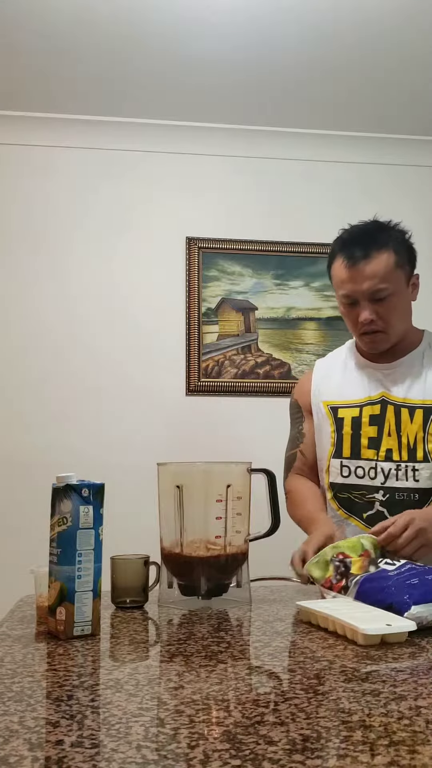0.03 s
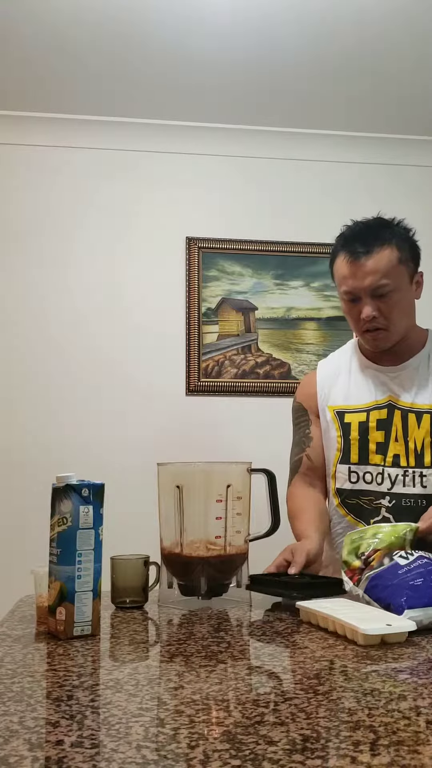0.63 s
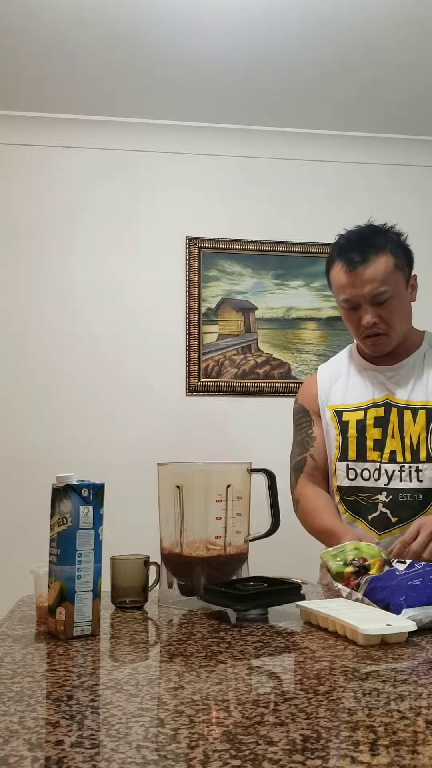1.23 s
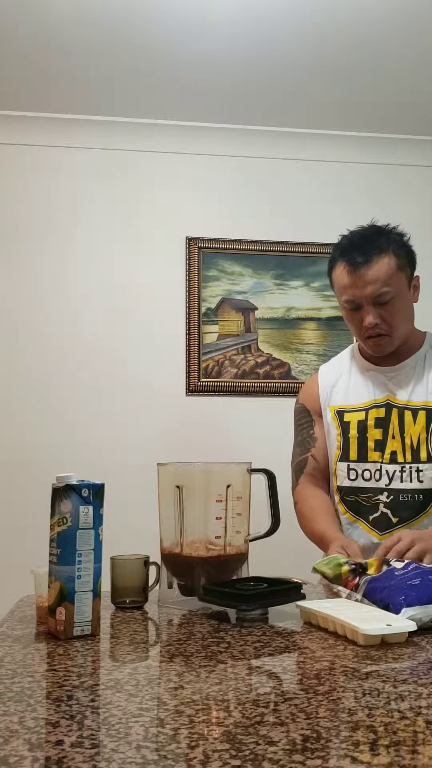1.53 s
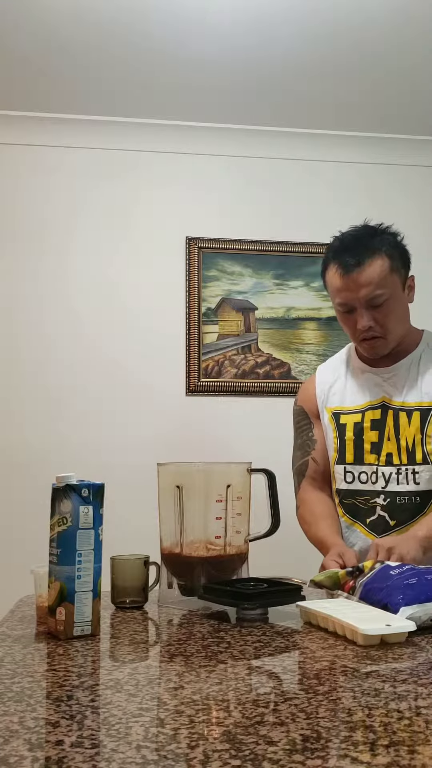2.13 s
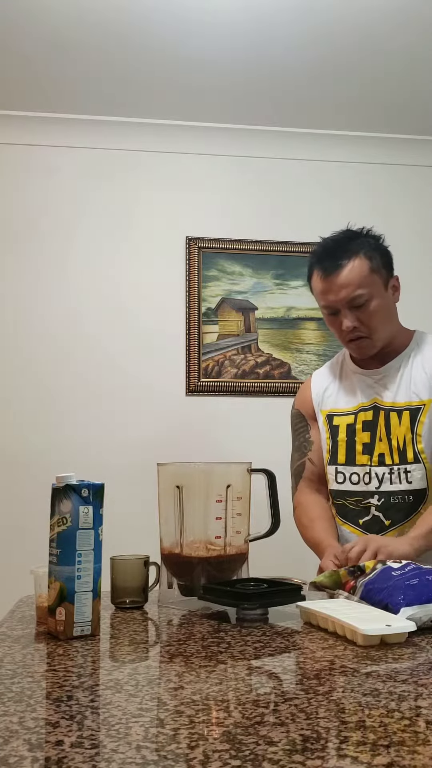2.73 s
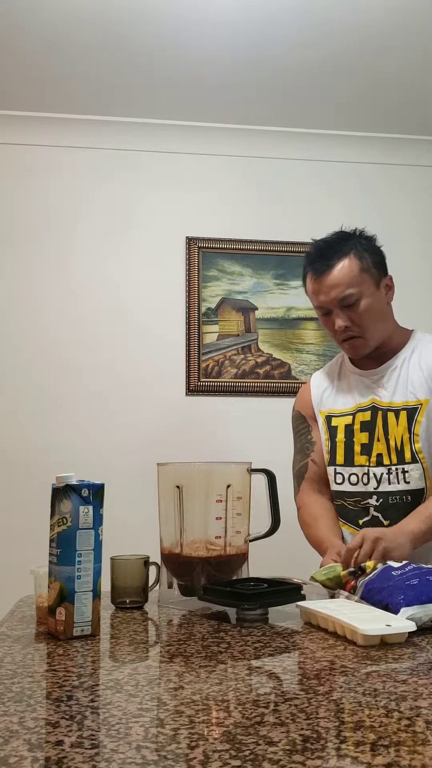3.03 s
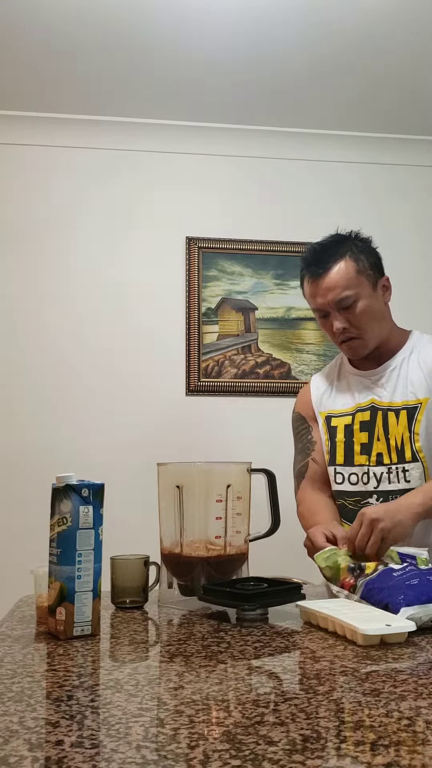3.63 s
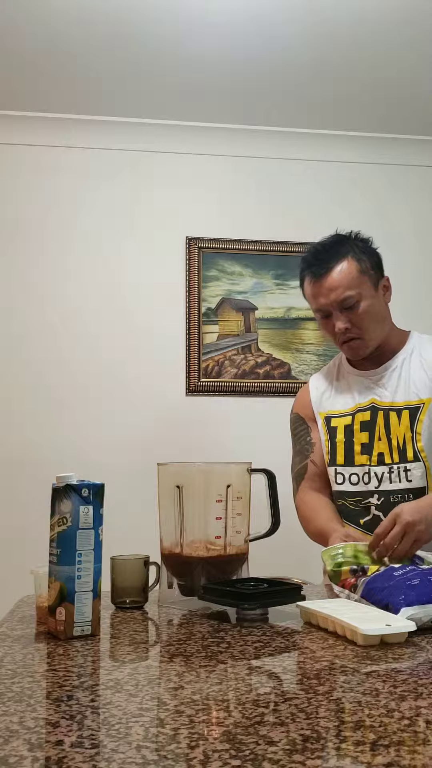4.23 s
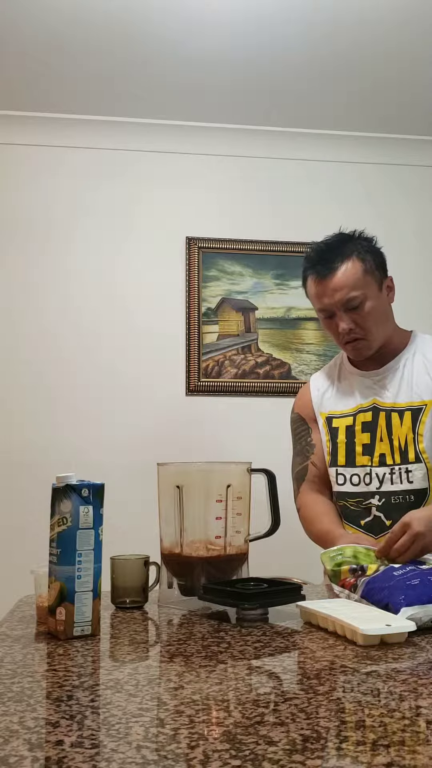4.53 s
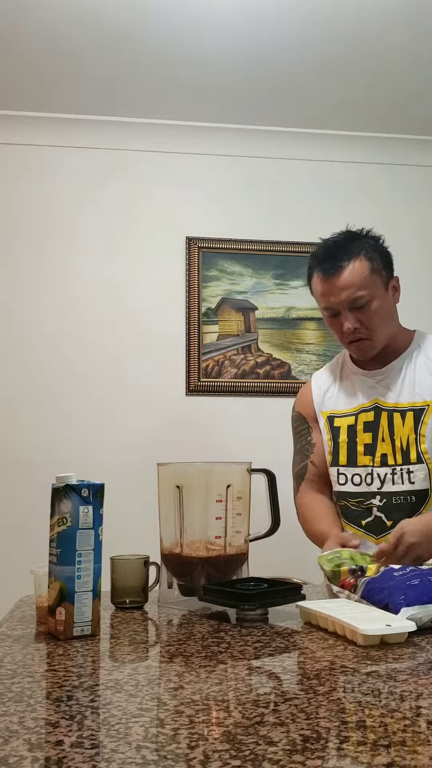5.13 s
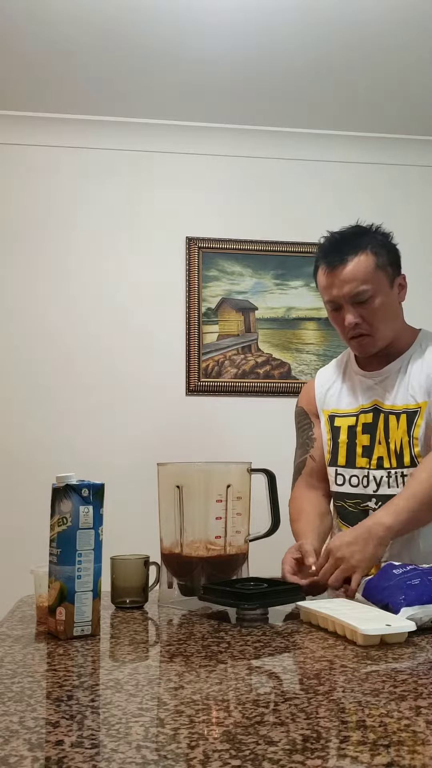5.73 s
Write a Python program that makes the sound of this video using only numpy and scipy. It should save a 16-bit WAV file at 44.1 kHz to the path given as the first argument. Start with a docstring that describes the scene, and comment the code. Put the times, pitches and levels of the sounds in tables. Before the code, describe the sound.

Plastic bags rustle and crackle in a small kitchen, with a plastic lid knocking and clattering onto the counter at the start.

```python
"""A hard plastic lid is knocked, clatters and is set down in the first second, among rustling food bags.
The bags are gripped and handled throughout: the film buckles in bursts of tiny clicks, snaps as single
creases flip, and sizzles where it glides over itself. All this is on a stone kitchen counter, about
a metre from a phone's two microphones. The small hard room answers everything, over a low mains hum."""
import sys
import numpy as np
from scipy import signal
from scipy.fft import rfft, irfft
from scipy.io import wavfile
from scipy.ndimage import uniform_filter1d

SR = 44100
rng = np.random.default_rng(int(sys.argv[2]) if len(sys.argv) > 2 else 0)


def store_wav(level_fs):
    """Save 16-bit WAV to argv[1]."""
    pcm = np.round(np.clip(np.atleast_2d(level_fs), -1, 1) * 32767)
    wavfile.write(sys.argv[1], SR, pcm.T.astype(np.int16))


N = 254898
T = np.arange(N) / SR
TAIL = 12288  # samples allowed for a ring or the room to die away

# Film sliding under the fingers. Each row: time in seconds, level in dB.
FILM_SLIDE = [(0, -48.5), (.3, -46), (.4, -42), (.48, -31), (.66, -50.5), (1.2, -62), (1.42, -60.5),
              (1.65, -48), (2.45, -59), (2.7, -42.5), (3.2, -49.5), (3.5, -54.5), (4.5, -56), (4.95, -65),
              (5.18, -52), (5.78, -48.5)]
# The dull click of a large panel of film. Each row: frequency in Hz, relative level in dB.
PANEL_SPECTRUM = [(80, -1.5), (180, -3), (330, -2.5), (630, -4.5), (880, 2.5), (1350, -2), (1900, -1.5),
                  (2600, -2), (3200, -5), (3800, -9.5), (5000, -9), (8000, -24.5), (16000, -65)]
# The bright tick of a small crease. Each row: frequency in Hz, relative level in dB.
CREASE_SPECTRUM = [(500, -41.5), (2000, -2), (3500, 2.5), (5000, 7), (6800, 3), (8200, -5.5), (10000, -1.5),
                   (12500, -3.5), (15800, -2)]


def bags():
    """Large panels of film crumple dully, small creases tick brightly; each grip sets off a burst."""
    # The fingers grip and the film gives way.
    # Each row: start in seconds, hold in seconds, level in dB, crispness in dB.
    grips = [(0, 0.026, -40, -10), (0.101, 0.025, -38, -3), (0.143, 0.074, -41, -14),
             (.222, 0.087, -34, -1.5), (0.318, 0.047, -39, -13), (0.538, 0.063, -37, -1),
             (.903, 0.068, -43.5, -6), (1.003, .045, -48.5, -2), (1.044, .029, -45.5, 10.5),
             (1.21, 0.037, -59.5, 8), (1.276, 0.033, -48.5, 2), (1.303, .075, -39.5, -0.5),
             (1.671, 0.017, -44, -0.5), (1.738, .145, -51.5, -3), (1.959, 0.11, -52, 2),
             (2.216, 0.028, -47.5, -4), (2.359, 0.17, -61, -17), (2.579, 0.027, -46, -5),
             (2.714, 0.082, -38, -3), (2.926, .033, -51, 3), (3.005, .058, -45.5, -0.5),
             (2.977, 0.019, -39.5, 5), (3.109, 0.049, -42.5, 3.5), (3.195, .05, -45, -6),
             (3.273, 0.019, -42, -2.5), (3.43, 0.089, -43.5, 0), (3.621, .047, -41, -6),
             (3.726, 0.04, -45.5, -9.5), (3.923, .125, -52.5, -16), (4.117, 0.074, -48, -13),
             (4.341, .022, -48.5, -5), (4.42, 0.024, -45.5, -3), (4.498, 0.064, -57, 1),
             (4.688, 0.054, -53, -0.5), (4.821, 0.036, -49.5, -0.5), (5.19, 0.082, -44.5, -7),
             (5.37, 0.08, -56.5, 8.5), (5.454, 0.089, -42.5, -9), (5.633, 0.15, -46.5, 0.5),
             (5.702, 0.019, -39.5, 4)]
    slide = undb(np.interp(T, *np.transpose(FILM_SLIDE)))
    panels = slide * undb(-4) * buckles(N, rate=350, spread_db=4)
    creases = slide * undb(-10) * buckles(N, rate=270, spread_db=6)
    for start, hold_s, db, crisp_db in grips:
        add(panels, start, undb(db) * grip(hold_s, rate=400))
        add(creases, start, undb(db + crisp_db) * grip(hold_s, rate=650))
    crumple = film_patches(panels, PANEL_SPECTRUM, flutter_db=2.5, wet_db=0.5)
    ticks = film_patches(creases, CREASE_SPECTRUM, flutter_db=-6.5, wet_db=-2)
    return crumple + ticks


def grip(hold_s, rate, attack_s=0.0011, release_s=0.003, swell_db=1):
    """Clicks of one grip start quickly, swell in mid-squeeze and die out as the fingers let go."""
    t = T[:int((hold_s + 4 * release_s) * SR)]
    pressure = (1 - np.exp(-t / attack_s)) * np.exp(-np.maximum(t - hold_s, 0) / release_s)
    swell = undb(swell_db * np.sin(np.pi * np.minimum(t / hold_s, 1)))
    return unit(pressure * swell * buckles(len(t), rate, spread_db=4.5)) * np.sqrt(hold_s * SR)


def buckles(size, rate, spread_db):
    """Film buckles at random, rate times a second: many small clicks and a few large, at rms 1."""
    count = max(int(rate * size / SR), 2)
    positions = (rng.random(8192)[:count] * size).astype(int)
    # strengths are spread exponentially in dB, up to the largest that a crease can give
    rank = np.arange(1, count + 1) / count
    strengths = undb(-spread_db * np.log(rank + 0.008))
    return unit(np.bincount(positions, strengths, size)) * np.sqrt(size)


def film_patches(clicks, spectrum, flutter_db, wet_db, flutter_s=0.0015, tint_db=2, count=4):
    """Each click comes from one of several patches of film with its own colour, brief ring and spot."""
    patch, out = rng.integers(0, count, N), 0
    hz, db = np.transpose(spectrum)
    tints = rng.standard_normal((count, len(hz)))
    for k, tint in enumerate(tints - tints.mean(axis=0)):
        flutter = undb(flutter_db) * unit(rng.standard_normal(TAIL) * np.exp(-T[:TAIL] / flutter_s))
        flutter[0] += 1  # the click itself
        path = kitchen(near_db=1, wet_db=wet_db, near_s=0.005)
        colour = click(np.column_stack([hz, db + tint_db * tint]))
        response = unit(through(through(path, flutter), colour))
        out = out + through(clicks * (patch == k), response)
    return out


def snaps(spots=6):
    """A crease flips with a crack, and the panel behind it pops at its own pitch."""
    # Each row: start in seconds, level in dB, crispness in dB, pitch of the panel in Hz.
    loud_creases = [(1.19, -16.5, -48, 1120), (1.277, -15, -25, 1630), (1.381, -15, -14, 830),
                    (1.625, -16.5, -30, 800), (1.788, -18, -11, 960), (1.883, -16.5, -26, 1640),
                    (1.964, -12, -25, 2320), (1.968, -26, 13.5, 1020), (2.048, -16, -28, 1730),
                    (2.074, -19, -37, 1100), (2.4, -21, -19, 1110), (2.589, -15, -11, 1750),
                    (2.6, -17, -25, 2570), (2.672, -17.5, -14, 1090), (2.979, -12, 0.5, 2420),
                    (2.992, -11.5, -20, 851), (3.2, -15, -12, 1740), (3.277, -15.5, -14, 2370),
                    (3.289, -15, -27, 1930), (3.409, -20.5, -7, 2380), (3.439, -23, 14, 2480),
                    (3.505, -13, -5.5, 2570), (3.731, -11, -10, 1420), (3.744, -16, -19, 2390),
                    (3.962, -19, -21, 806), (4.118, -17, -23, 1750), (4.145, -15, -7, 2570),
                    (4.222, -21, -13, 1070), (4.432, -22, -16, 1030), (4.651, -24, 2.5, 2470),
                    (4.702, -22.5, -25, 890), (4.884, -19.5, -12, 800), (5.096, -12.5, -31, 2310),
                    (5.101, -17, 2.5, 3000), (5.191, -17.5, -27, 1730), (5.458, -16, -19, 2740),
                    (5.483, -19.5, -19, 830), (5.709, -15, -3, 930), (5.757, -15.5, 6.5, 2200)]
    out = np.zeros((2, N))
    paths = [kitchen(near_db=4, wet_db=-1.5, near_s=0.0058) for _ in range(spots)]
    dull, bright = click(PANEL_SPECTRUM), click(CREASE_SPECTRUM)
    for k, (start, db, crisp_db, hz) in enumerate(list(loud_creases) + faint_creases()):
        path = paths[k % spots]
        pop = unit(through(path, dull + undb(-4) * flex(hz, rise_s=0.00056)))
        crack = unit(through(path, bright))
        add(out, start, undb(db) * (pop + undb(crisp_db) * crack))
    return out


def faint_creases(per_second=9, over_slide_db=26.5, low_hz=760, high_hz=2910):
    """More rows for snaps(): creases flip at uneven gaps, as strongly as the film is being moved."""
    gap, softness, colour, pitch = rng.random((128, 4)).T
    starts = np.cumsum(0.2 + 1.6 * gap) / per_second
    db = np.interp(starts, *np.transpose(FILM_SLIDE)) + over_slide_db - (2 * softness - 1)
    crisp_db = -17 + 8 * (2 * colour - 1)
    hz = low_hz * (high_hz / low_hz) ** pitch
    return list(np.column_stack([starts, db, crisp_db, hz])[starts < T[-1]])


def glides():
    """Film gliding over film gives a fine, very high sizzle that swells and fades."""
    # Each row: start in seconds, end in seconds, level in dB.
    strokes = [(0.619, 0.895, -49), (0.893, 0.938, -44), (1.286, 1.394, -47), (1.83, 2.098, -60),
               (2.223, 2.262, -41.5), (3.94, 4.052, -66), (4.135, 4.197, -56), (4.197, 4.4, -62.5),
               (5.629, 5.78, -50.5)]
    clicks = np.zeros(N)
    for start, end, db in strokes:
        size = int((end - start) * SR)
        swell = np.sqrt(np.hanning(size))
        add(clicks, start, undb(db) * swell * buckles(size, rate=2800, spread_db=4.5))
    sizzle = click([(3000, -40), (7500, 1.5), (9200, 3.5), (11500, -4), (14000, 5.5), (16000, 4)])
    return through(clicks, through(kitchen(near_db=7, wet_db=-2), sizzle))


def lid_knocks(soft_hz=2200):
    """Blows flex the lid's wall and wake its low modes; on the hard rim they crack and ring high too."""
    # Each row: start in seconds, level in dB, sharpness in dB, wall pitch in Hz, wall share in dB.
    blows = [(0.0883, -7.5, -19, 967, 8.5), (.140, 0, -31, 1015, 1), (.149, 0, -32, 1400, -12),
             (.254, 2.5, -36, 840, 8), (0.384, -8.5, -12.5, 1060, 0), (.415, 1, -3.5, 1970, -6.5),
             (.423, 7.5, 3, 900, -0.5), (.430, 4.5, 3.5, 890, -7.5), (0.437, -1.5, 5, 1350, 1),
             (0.485, -5.5, 0.5, 960, -2.5), (.494, -5.5, 3, 1970, 1.5), (0.552, -5.5, -12, 1030, 7),
             (.570, -2, -3.5, 1370, -2), (0.605, 2, -11, 1720, 5), (0.6134, 7.5, -15, 1350, -10.5),
             (0.623, 6.5, -12.5, 1620, 0.5)]
    # The lid's ring. Each row: frequency in Hz, t60 in seconds, relative level in dB.
    modes = [(250, 0.046, -12.5), (462, 0.032, -12), (700, 0.046, -22), (937, 0.065, -1.5),
             (1160, 0.026, -21), (1320, 0.031, -7), (1410, 0.039, -15.5), (1765, .028, -4.5),
             (1886, 0.041, 2.5), (2570, 0.039, -3.5), (2930, .025, -19), (4076, 0.072, 0.5),
             (4740, 0.015, -5), (6250, 0.028, -8), (7140, 0.032, 0), (8930, 0.019, 1), (10600, 0.025, -1),
             (11920, 0.013, 2), (13260, .012, -16)]
    # The dull and the sharp part of a contact. Each row: frequency in Hz, relative level in dB.
    knock_spectrum = [(50, -25.5), (170, 0), (300, -8), (600, -3.5), (1000, 5.5), (1900, -0.5), (2800, -5),
                      (4000, -18), (8000, -38), (16000, -27)]
    crack_spectrum = [(400, -38.5), (2000, 6.5), (4200, 9.5), (5600, 1), (7200, 14), (8200, -13.5),
                      (10400, 1.5), (11300, -9.5), (13000, 14), (14200, -10), (16000, -7)]
    out, t = np.zeros((2, N)), T[:TAIL]
    # a soft contact lasts too long to wake the high modes
    low_modes = [(hz, t60, db - 10 * np.log10(1 + (hz / soft_hz) ** 6)) for hz, t60, db in modes]
    for start, db, sharp_db, wall_hz, wall_db in blows:
        path = kitchen(near_db=4, wet_db=-2, near_s=0.004)
        # the rim chatters for a moment before it lets go
        chatter = unit(rng.standard_normal(TAIL) * t * np.exp(-t / 0.00059))
        rim = through(path, chatter)
        bend = undb(wall_db) * unit(through(path, flex(wall_hz, rise_s=0.0011)))
        low_ring = undb(-1.5) * unit(through(path, ring(low_modes)))
        knock = unit(unit(through(rim, click(knock_spectrum))) + low_ring + bend)
        full_ring = undb(-4) * through(path, ring(modes))
        crack = unit(through(rim, click(crack_spectrum)) + full_ring)
        add(out, start, undb(db) * (knock + undb(sharp_db) * crack))
    return out


def lid_settling():
    """The lid is pressed down onto its rest with a few cushioned thuds."""
    # Each row: start in seconds, level in dB, share of hard contact in dB.
    thuds = [(0.819, -8, -20), (0.829, -6.5, -12), (0.876, -14.5, 19), (0.908, -11.5, -12), (0.93, -8, -7),
             (0.944, -16, 4)]
    # Lid and rest ring together. Each row: frequency in Hz, t60 in seconds, relative level in dB.
    modes = [(220, 0.045, -12.5), (394, 0.058, 1), (470, 0.059, -17), (583, 0.1, -12), (851, 0.035, -9),
             (1168, 0.085, -11.5)]
    # Each row: frequency in Hz, relative level in dB.
    contact_spectrum = [(70, -19), (250, 3.5), (450, -10), (1100, -6), (2000, -5), (4000, -14.5),
                        (16000, -34)]
    out = np.zeros((2, N))
    for start, db, hard_db in thuds:
        path = kitchen(near_db=5.5, wet_db=-1)
        contact = undb(hard_db) * through(path, click(contact_spectrum))
        add(out, start, undb(db) * unit(through(path, ring(modes)) + contact))
    return out


def flex(hz, rise_s):
    """A thin wall swings up and dies away within a few cycles."""
    t = T[:2048]
    return unit(np.sin(2 * np.pi * hz * t) * t * np.exp(-t / rise_s))


def ring(modes):
    """Decaying modes; their random signs stand for where the blow lands."""
    t, out = T[:TAIL], 0
    for hz, t60, db in modes:
        mode = unit(np.sin(2 * np.pi * hz * t) * undb(-60 * t / t60))
        out = out + rng.choice([-1, 1]) * undb(db) * mode
    return unit(out)


def click(spectrum, size=2048):
    """The shortest causal click that has this spectrum."""
    gains = undb(along(spectrum, np.fft.rfftfreq(size, 1 / SR)))
    cepstrum = irfft(np.log(gains))
    cepstrum[1:size // 2] *= 2
    cepstrum[size // 2 + 1:] = 0
    return unit(irfft(np.exp(rfft(cepstrum))))


def kitchen(near_db, wet_db, near_s=0.0084, gap_s=0.0021):
    """From one spot to the microphones: direct sound, scatter off counter and jars, then the walls."""
    # Each row: frequency in Hz, t60 in seconds.
    room_decay = [(125, 0.15), (500, 0.27), (2000, 0.2), (6000, 0.23), (14000, 0.16)]
    t, hz = T[:TAIL], np.fft.rfftfreq(TAIL, 1 / SR)
    direct = np.zeros((2, TAIL))
    direct[0, 4] = direct[1, 0] = 1  # reaches the left microphone four samples later
    scatter = unit(diffuse(TAIL) * np.exp(-t / near_s))
    noise, walls = rfft(diffuse(TAIL)), 0
    centres, t60s = np.transpose(room_decay)
    for share, t60 in zip(np.eye(len(centres)), t60s):
        band = irfft(noise * along(np.column_stack([centres, share]), hz))
        walls = walls + band * undb(-60 * t / t60)
    walls = unit(walls * (1 - np.exp(-(t / gap_s) ** 2)))
    return unit(direct + undb(near_db) * scatter + undb(wet_db) * walls)


def room_tone(hum_hz=100):
    """Faint room air and a slightly wavering mains hum with a weaker line an octave below."""
    # Each row: frequency in Hz, relative level in dB.
    air_spectrum = [(20, -23.5), (48, -4), (75, -6.5), (100, 2), (140, -7), (400, -10.5), (900, -20.5),
                    (2500, -38.5), (6000, -32), (16000, -35.5)]
    # Each row: time in seconds, level in dB.
    hum_levels = [(0, -51), (.8, -58), (1.7, -56), (2.1, -51.5), (5.78, -51.5)]
    air = undb(-58.5) * through(diffuse(N), click(air_spectrum))
    phase = 2 * np.pi * hum_hz * T
    hum_db = np.interp(T, *np.transpose(hum_levels)) + 1.7 * wander(6.8)
    hum = undb(hum_db) * np.sin(phase + 0.18 * wander(12))
    octave_below = undb(-62 + 1.5 * wander(5.3)) * np.sin(phase / 2 + 1.2 * wander(5.9))
    return air + hum + octave_below


def diffuse(size, spacing_m=0.15):
    """Noise from all sides at two microphones: alike only for waves long against their spacing."""
    coherence = np.sinc(2 * np.fft.rfftfreq(size, 1 / SR) * spacing_m / 343)
    mid, side = rfft(rng.standard_normal((2, size)))
    pair = mid * np.sqrt(1 + coherence) + np.array([[1], [-1]]) * side * np.sqrt(1 - coherence)
    return irfft(pair, size) / np.sqrt(2)


def wander(rate):
    """Random levels held for 1 / rate seconds and smoothed twice; spread near 1."""
    hold = int(SR / rate)
    held = rng.standard_normal(1024)[np.arange(N) // hold]
    return 1.3 * uniform_filter1d(uniform_filter1d(held, hold), hold)


def undb(db):
    """Decibels to gain."""
    return 10 ** (np.asarray(db) / 20)


def unit(response):
    """Scale a response to unit energy, averaged over its channels."""
    return response / np.sqrt(np.mean(np.sum(response ** 2, axis=-1)))


def along(points, hz):
    """Read (Hz, value) points on a log-frequency axis."""
    point_hz, value = np.transpose(points)
    return np.interp(np.log(hz + 1), np.log(point_hz), value)


def through(sound, response):
    """Play a sound through a response."""
    return signal.oaconvolve(np.atleast_2d(sound), np.atleast_2d(response), axes=-1)[:, :sound.shape[-1]]


def add(out, start, sound):
    """Mix a sound in at a start time in seconds."""
    i = int(np.clip(start * SR, 0, N - 1))
    out[..., i:i + sound.shape[-1]] += sound[..., :N - i]


def scene():
    """Lid and bags on the counter of the humming kitchen."""
    return room_tone() + lid_knocks() + lid_settling() + bags() + snaps() + glides()


def record(dry, ceiling=0.8, top_hz=15900):
    """The microphones differ in colour; a soft limiter rounds the loudest peaks, and the top is cut."""
    # The left microphone hears less treble. Each row: frequency in Hz, left minus right in dB.
    mic_tilt = [(200, 0.5), (700, -1.5), (1300, -0.5), (2400, -4), (6000, -3.5), (7800, 0), (9500, -11),
                (11500, -8), (15000, -6.5)]
    tilt_db = along(mic_tilt, np.fft.rfftfreq(N, 1 / SR))
    gains = undb(np.array([tilt_db, -tilt_db]) / 2)
    coloured = irfft(rfft(dry) * gains / np.sqrt(np.mean(gains ** 2, axis=0)), N)
    rounded = ceiling * np.tanh(coloured / ceiling)
    return signal.sosfilt(signal.ellip(10, 0.2, 70, top_hz, fs=SR, output="sos"), rounded)


dry = scene()
out = record(dry)
store_wav(out)
```